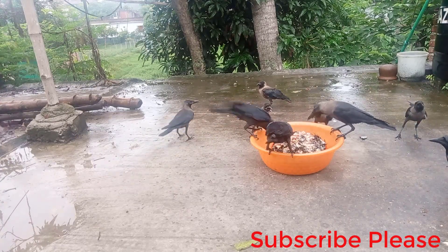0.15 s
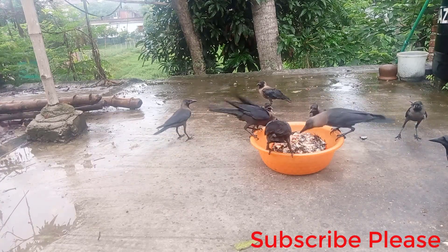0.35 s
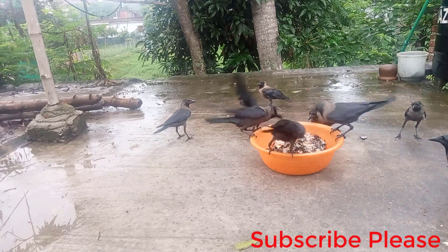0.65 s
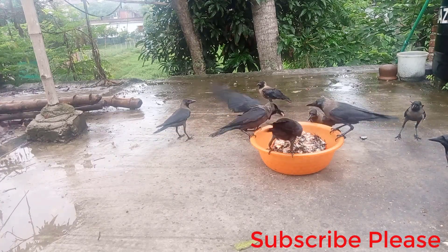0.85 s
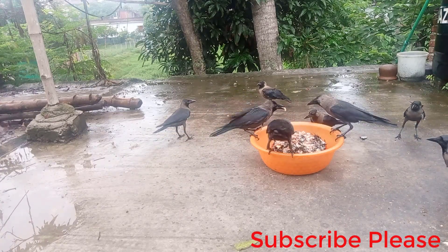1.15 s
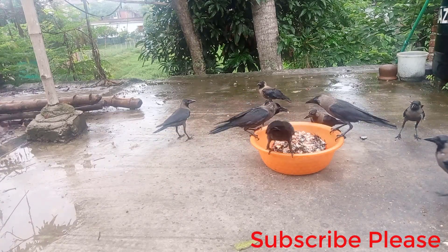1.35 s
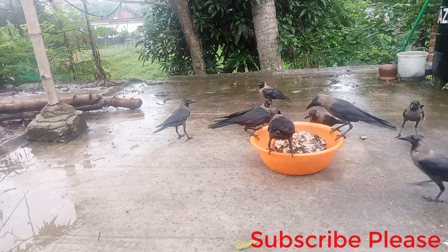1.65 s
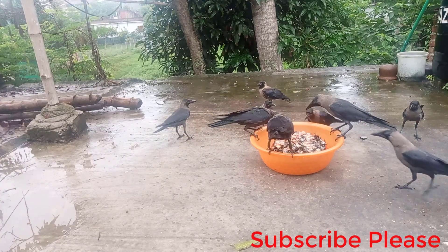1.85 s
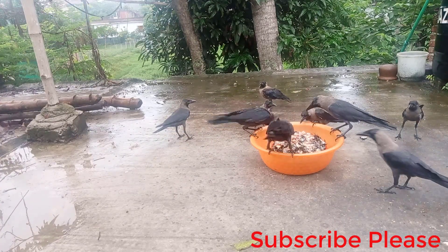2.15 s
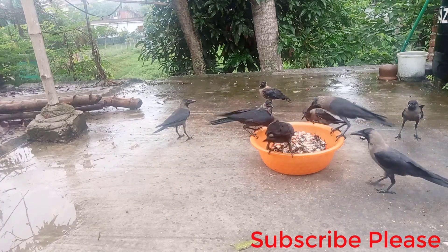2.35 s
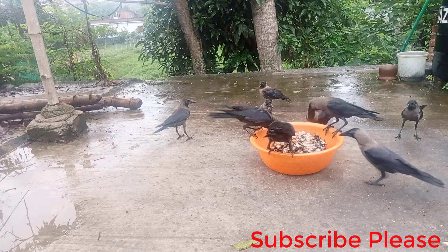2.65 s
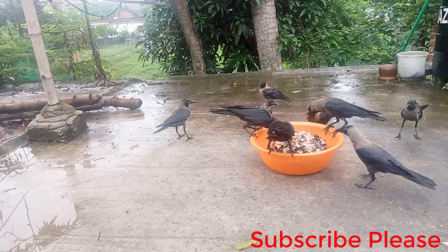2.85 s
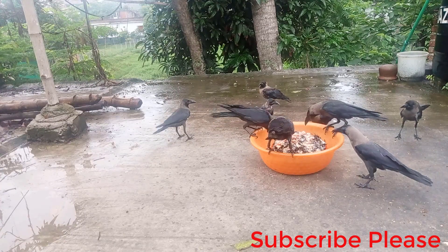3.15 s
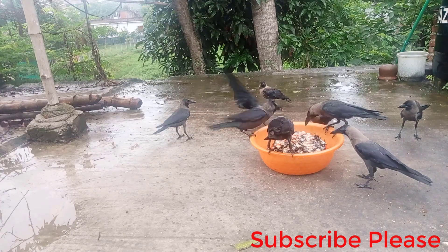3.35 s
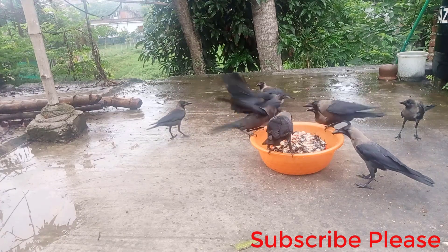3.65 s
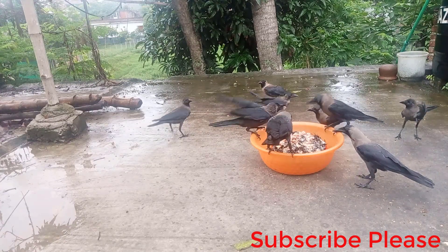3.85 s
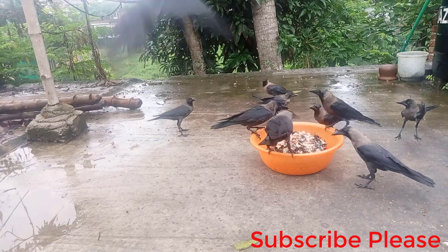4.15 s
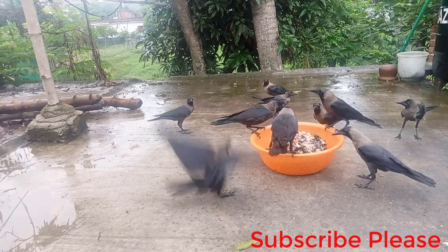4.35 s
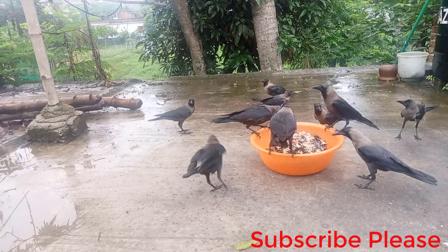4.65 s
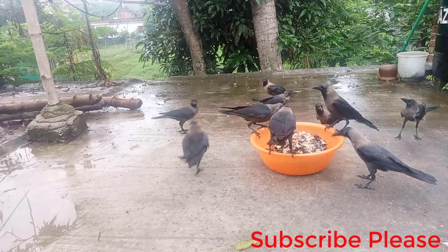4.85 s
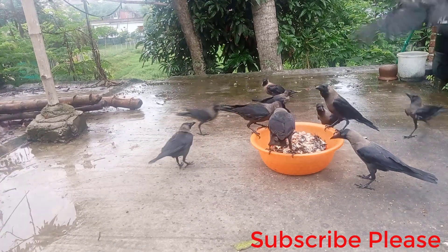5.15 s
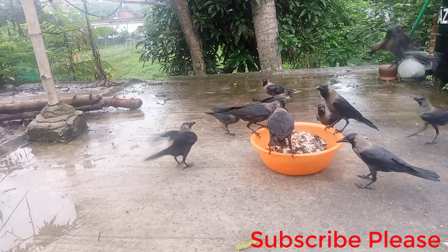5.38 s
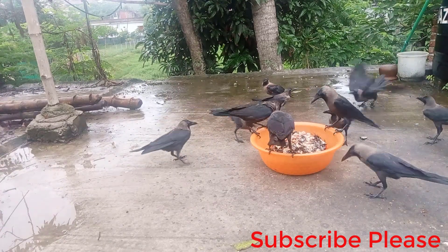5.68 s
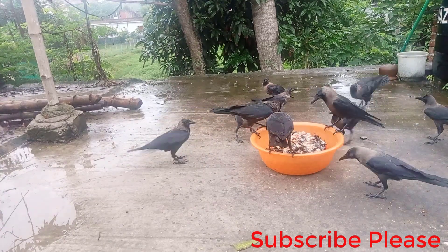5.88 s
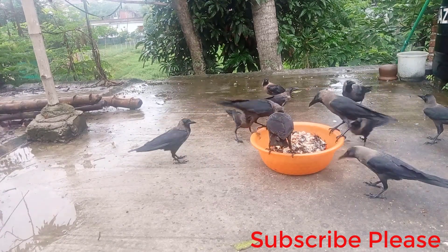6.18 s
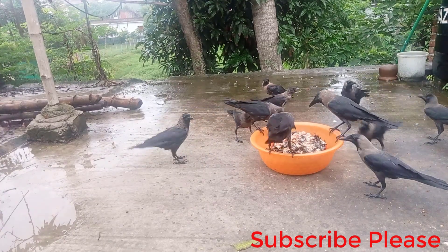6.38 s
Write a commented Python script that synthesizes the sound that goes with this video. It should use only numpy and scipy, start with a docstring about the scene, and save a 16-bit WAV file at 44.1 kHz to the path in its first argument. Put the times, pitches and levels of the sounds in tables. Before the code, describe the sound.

In a yard with faint chirps, far-off crows, insect hiss and a low hum, a few pecks and three loud, hoarse caws sound close by. The crows then scuffle, rustling their feathers and rapping a hollow plastic basin with their beaks. Wingbeats swish in, pushing a short low rumble of wind onto the microphone, and feet patter on wet concrete. The rustling settles, ending with some light pecks.

```python
"""Crows feed from a plastic basin on a wet concrete yard, over open air, insects and a faint hum.
First come three harsh, close caws, buzzing membranes shaped by throat and beak, with a few pecks and a
far, hoarse, rising call between. Small birds chirp and distant crows caw throughout. From about 3.5 s
the crows jostle: feathers rustle, beaks tick in the food and knock the basin. At 4.3 s a crow flies in
on swishing wings; gusts rumble on the microphone, feet slap the wet ground, and a few last pecks land."""
import sys
import numpy as np
from scipy import signal
from scipy.fft import rfft, irfft, next_fast_len
from scipy.io import wavfile
from scipy.ndimage import uniform_filter1d, map_coordinates

SR = 44100
rng = np.random.default_rng(int(sys.argv[2]) if len(sys.argv) > 2 else 0)


def wav_record(signal):
    """Record a signal, one row per channel, as 16-bit PCM in the file named by sys.argv[1]."""
    frames = np.transpose(np.atleast_2d(signal))
    bounded = np.clip(frames, -1, 1)
    # unit amplitude maps onto the largest positive 16-bit level
    quanta = np.round(bounded * 32767).astype(np.int16)
    wavfile.write(sys.argv[1], SR, quanta)


N = 287532
TIME = np.arange(N) / SR

# near caws: (time [s], length [s], full-tension pitch [Hz], scoop [s], sag [share], final drop [s],
# flutter depth [share], fluttering part [share], half-tones [dB], roughness [0-1], beak closing [0-1])
NEAR_CAWS = [(0.548, 0.51, 1051, .053, .35, 0.029, .062, 0.82, -4, .08, 0.76),
             (1.256, 0.44, 950.4, 0.024, .47, 0.023, 0.075, 1.08, -10.5, .04, 0.03),
             (2.476, .366, 1163, .024, .26, .021, 0.067, .54, -20, 0.05, 0)]
# envelope of each near caw: (time [s], level [dB], treble against body [dB])
CAW_ENVELOPES = [
    [(0.55, -49, -11), (0.558, -33.5, -18), (0.588, -22, -14), (0.65, -18.5, -13.5), (0.758, -17.5, -15),
     (0.978, -22, -16), (1.02, -28, -14.5), (1.07, -66, -18)],
    [(1.25, -54, -29), (1.268, -48.5, -22), (1.292, -36.5, -21.5), (1.37, -32, -20), (1.41, -37.5, -17),
     (1.418, -34.5, -18), (1.548, -36.5, -18.5), (1.658, -41.5, -19.5), (1.75, -65, -1)],
    [(2.475, -51, -12), (2.495, -34, -18.5), (2.517, -29.5, -14.5), (2.629, -27.5, -10),
     (2.721, -27, -16.5), (2.737, -34.5, -9), (2.779, -26, -21.5), (2.793, -37, -6.5),
     (2.845, -44.5, -15.5)],
]
# throat and beak resonances of the loud, soft and clear caw: (frequency [Hz], gain [dB])
THROAT_LOUD = [(300, -19), (600, -14.5), (1050, -19), (1500, 1), (2050, 8), (2500, 0.5), (3100, -20.5),
               (3800, -10.5), (4300, -14.5), (4900, -27.5), (5700, -20), (6400, -27), (7250, -20),
               (7900, -33), (8500, -31), (12000, -42.5), (15500, -38)]
THROAT_SOFT = [(450, -11), (750, -3), (1000, 1.5), (1400, 9), (1850, 8), (2300, 10.5), (3100, -18.5),
               (4200, -29), (4700, -22.5), (5100, -30), (5650, -23), (6150, -30), (7250, -22),
               (8200, -29.5), (9500, -32), (15000, -47)]
THROAT_CLEAR = [(450, 2), (750, 0), (1150, -6), (1600, 4.5), (2100, 10), (2600, -3.5), (3000, -18.5),
                (3400, -8), (4100, -35.5), (4650, -26), (5150, -31), (5800, -26.5), (6400, -26.5),
                (7100, -13), (8300, -30), (10000, -29.5), (12500, -43), (15500, -38)]
# tone shift of a closing beak: (frequency [Hz], gain [dB])
CLOSING_EQ = [(900, 3.5), (1450, -3), (2000, -2), (2450, 3.5), (2950, 12.5), (3600, -11), (4300, -16.5),
              (5050, 12), (5800, -7.5), (7200, -2), (12000, 3.5)]
# air rushing past the membranes: (frequency [Hz], gain [dB])
RASP_EQ = [(500, -6), (1200, 12), (2300, 0), (4000, 10.5), (8000, 23), (15000, 13.5)]
# early reflections off the concrete and nearby things: (delay [s], gain [dB])
REFLECTIONS = [(.0013, -35), (.0047, -22), (.0089, -12), (0.0166, -8.5)]
# sharp beak clicks: (time [s], relative level [dB], t60 [s])
PECKS = [(.045, -27.5, 0.022), (1.157, -27, 0.031), (1.174, -26.5, .009), (3.32, -41, .015),
         (3.467, -34, .052), (3.612, -13, 0.007), (3.623, -29, 0.063), (3.791, -37.5, 0.037),
         (3.88, -22, 0.012), (3.888, -18.5, 0.0092), (5.154, -32.5, 0.037), (6.268, -37, 0.02),
         (6.39, -35.5, 0.036), (6.487, -31, 0.04)]
# soft scrapes and brisk wing strokes: (time [s], relative level [dB], t60 [s])
SCRAPES_AND_STROKES = [(.026, -39.5, 0.042), (2.394, -35, 0.065), (3.836, -35.5, 0.15), (4.482, -32, 0.06),
                       (4.748, -35.5, 0.095), (5.685, -40.5, 0.081), (6.404, -29, 0.0075)]
# tone shared by clicks, scrapes and brisk strokes: (frequency [Hz], gain [dB])
BURST_EQ = [(300, 3.5), (1500, 6), (3800, 10), (5500, -5.5), (7500, 3), (11000, -11.5), (15000, -4)]
# blows on the basin: (time [s], gain [dB])
KNOCKS = [(1.175, -60), (3.485, -56), (3.612, -33), (3.624, -41), (3.70, -57), (6.487, -47)]
# modes of the plastic basin: (frequency [Hz], relative level [dB], t60 [s])
BASIN_MODES = [(188, -41.5, .07), (381, 0.5, 0.077), (487, 9, 0.071), (568, 7.5, 0.034), (766, -5.5, 0.066),
               (1830, -8, .04)]
# feet on wet ground: (time [s], relative level [dB], t60 [s], centre [Hz])
SLAPS = [(4.912, -32, 0.16, 1490), (5.153, -28.5, 0.2, 2230), (5.154, -31, 0.36, 664),
         (5.41, -32.5, 0.18, 910)]
# tone of rustling feathers: (frequency [Hz], gain [dB])
FEATHER_EQ = [(300, 14), (1000, 3), (3300, 6), (4700, -5.5), (7300, 0), (11000, -13), (15000, -8)]
# gusts on the microphone: (time at full strength [s], hold [s], level [dB])
GUSTS = [(4.602, 0.096, -25.5), (4.748, 0.095, -22), (4.912, 0.12, -22.5), (5.209, 0.18, -36.5),
         (5.274, 0.014, -33.5), (5.478, .08, -36), (5.612, 0.19, -42), (6.139, 0.017, -39),
         (6.357, 0.23, -50.5)]
# rumble of their eddies: (frequency [Hz], gain [dB])
EDDY_EQ = [(15, -52), (25, -22), (82, 1), (180, -2.5), (258, -9), (293, -10), (399, -22.5), (469, -24),
           (800, -46.5), (1200, -65), (1560, -81), (2640, -120)]
# the hardest buffets of air: (time [s], level [dB], width [s])
BUFFETS = [(1.246, -40.5, 0.0025), (4.671, -18, 0.00084), (4.711, -19.5, 0.00068), (4.813, -13, 0.00081),
           (4.833, -5.5, 0.0015), (4.916, -14, 0.0016), (4.945, -9.5, 0.00062), (5.037, -11.5, .0012),
           (5.298, -21.5, 0.0012)]
# distant caws: (time [s], length [s], top pitch [Hz], relative level [dB])
FAR_CAWS = [(0.131, 0.19, 596, -50.5), (2.839, 0.18, 695, -55), (3.207, .26, 691, -49.5),
            (4.313, 0.29, 618, -52.5), (4.716, 0.36, 599, -52), (5.755, 0.29, 683, -49)]
# a crow's voice dulled by distance: (frequency [Hz], gain [dB])
FAR_EQ = [(330, -12), (650, -16), (1000, -6), (1400, -12), (1900, 5), (2350, -1), (3000, -14), (4000, -14),
          (9000, -48)]
# small-bird chirps and squeaks, and one long, hoarse, rising call from afar:
# (time [s], length [s], pitch [Hz], glide [octaves], level [dB])
BIRD_CALLS = [(0.446, 0.12, 3300, -0.52, -57.5), (1.14, 0.053, 2935, 0.052, -36),
              (1.18, 0.083, 2950, 0.0016, -52.5), (1.876, 0.7, 1770, 0.34, -59.5),
              (2.114, 0.064, 3120, -0.12, -59.5), (2.253, 0.093, 3460, -0.45, -59),
              (3.555, .067, 2800, 0.21, -51.5), (3.655, 0.025, 2300, -.08, -50.5),
              (3.788, 0.047, 1856, -.12, -53.5), (3.82, 0.079, 2850, .33, -42),
              (3.903, .12, 2395, -.55, -54), (4.089, .095, 2900, .22, -62.5), (4.25, 0.38, 4190, -.01, -60),
              (4.578, 0.1, 2560, 0.49, -57.5), (4.649, 0.088, 2810, -0.39, -58.5),
              (4.758, .1, 2966, -.17, -57), (4.98, 0.205, 4250, -0.12, -65),
              (5.304, 0.049, 3280, -0.25, -54)]
# tone of the open air: (frequency [Hz], gain [dB])
AIR_EQ = [(15, -52), (25, -25), (92, 4), (170, -5.5), (200, 2.5), (229, -4.5), (476, -9.5), (575, -13),
          (1290, -17.5), (1740, -14.5), (2840, -16.5), (3160, -14.5), (6210, -32), (8830, -24.5),
          (16000, -51)]
# bands of insect hiss: (centre [Hz], width [Hz], level [dB])
INSECT_BANDS = [(5450, 390, -74), (7050, 570, -77), (8930, 200, -80)]
# partials of the hum: (frequency [Hz], level [dB])
HUM_PARTIALS = [(100.5, -70), (200.5, -62)]
# reverb time of the yard: (frequency [Hz], t60 [s])
YARD_DECAY = [(200, 0.13), (2000, 0.34), (5000, 0.19), (14000, 0.12)]

JOSTLE_START_S = 3.47
HIT_TIME = TIME[:SR // 4]


def near_crows():
    """Three close caws, each through its own throat, with early reflections."""
    direct = np.zeros(N)
    throats = THROAT_LOUD, THROAT_SOFT, THROAT_CLEAR
    for row, envelope, throat in zip(NEAR_CAWS, CAW_ENVELOPES, throats):
        add(direct, *caw(row, envelope, throat))
    out = direct.copy()
    for delay, db in REFLECTIONS:
        add(out, delay, amp(db) * direct)
    return out


def caw(row, envelope, throat, taut_flutter_hz=83.14, crossover_hz=3100):
    """One arch of membrane tension drives pitch, flutter and grit; throat and beak filter the buzz."""
    start, length, taut_hz, scoop_s, sag, drop_s, depth, fluttering, half_db, rough, closes = row
    t = np.arange(0, length, 1 / SR)
    scoop = 1 - .53 * np.exp(-t / scoop_s)
    droop = 1 - sag * (t / length) ** 2.5
    drop = 1 - .68 * np.exp((t - length) / drop_s)  # the air runs out
    tension = np.maximum(scoop * droop * drop, .1)
    slack = 1 - tension
    calm = np.clip((t - fluttering * length) / .03, 0, 1)  # rises as the flutter dies
    closing = closes * np.clip((t - .604 * length) / .044, 0, 1)
    # starting and slack membranes buzz unevenly, and the closing beak adds rasp
    rough = rough + .55 * np.exp(-t / .04) + .85 * slack ** 2 + .25 * closing
    buzz = syrinx(taut_hz * tension, taut_flutter_hz * tension ** .4,
                  depth=depth + (.006 - depth) * calm,
                  half_db=half_db + 21.5 * slack + 4 * calm,
                  rough=rough * (1 - .85 * calm * tension))
    voice = colour(buzz, throat)
    voice = (1 - closing) * voice + closing * colour(voice, CLOSING_EQ)
    body = signal.sosfiltfilt(signal.butter(6, crossover_hz, fs=SR, output="sos"), voice)
    times, *columns = np.transpose(envelope)
    level_db, treble_db = (np.interp(start + t, times, column) for column in columns)
    voice = steady(body) + amp(treble_db) * steady(voice - body)
    return start, amp(level_db) * voice * signal.windows.tukey(len(t), .03)


def syrinx(hz, flutter_hz, depth, half_db, rough, jitter=.06, tremble=.007, throb=.34, smear=1.2):
    """Membranes buzz, every other cycle unlike the last, while a flutter swings pitch and level."""
    size = len(hz)
    flutter = phase(flutter_hz * (1 + .19 * rough * wander(size, 120)))
    unsteady = jitter * rough * wander(size, 700) + tremble * wander(size, 1500)
    pitch = hz * (1 + depth * np.sin(flutter) + unsteady)
    k = np.arange(1, 49)[:, None]  # multiples of half the pitch: the odd ones are the half-tones
    half_tones = np.minimum(amp(half_db) * k / 4, 1)  # unequal cycles show most in the highs
    strength = np.where(k % 2, half_tones, 1) * (k * pitch < SR * .85)
    # soft membranes close gradually, which smears each pulse over its cycle
    buzz = unit((strength * np.cos(k * phase(pitch / 2) + smear * k ** 2)).sum(0))
    hiss = (.015 + .5 * rough) * colour(rng.standard_normal(size), RASP_EQ)
    return (buzz + hiss) * (1 + throb * np.tanh(20 * depth) * np.cos(flutter + .022))


def pecks_and_scuffles(ticks_per_s=7.6, snap_s=.00044, swell_s=.0061):
    """Pecks snap, soft scrapes and brisk wing strokes swell, and jostling birds tick in the food."""
    out = np.zeros(N)
    span = N / SR - JOSTLE_START_S
    ticks = [(JOSTLE_START_S + span * when, -60 + 24 * loud, .012)
             for when, loud in rng.random((int(ticks_per_s * span), 2))]
    for rows, attack_s in (PECKS, snap_s), (SCRAPES_AND_STROKES, swell_s), (ticks, snap_s):
        attack = np.minimum(HIT_TIME / attack_s, 1) ** 2
        for start, db, t60 in rows:
            release = decay(np.maximum(HIT_TIME - attack_s, 0), t60)
            add(out, start, amp(db - 9) * noise(len(HIT_TIME), BURST_EQ) * attack * release)
    return out


def basin():
    """Each knock rings the short, hollow modes of the plastic."""
    out = np.zeros(N)
    ring = sum(amp(db) * decay(HIT_TIME, t60) * np.sin(2 * np.pi * hz * HIT_TIME)
               for hz, db, t60 in BASIN_MODES)
    for start, db in KNOCKS:
        add(out, start, amp(db) * ring)
    return out


def feet():
    """Feet slap the wet ground in dull bursts of noise."""
    out = np.zeros(N)
    for start, db, t60, hz in SLAPS:
        add(out, start, amp(db - 11.5) * band(len(HIT_TIME), hz, .63 * hz) * decay(HIT_TIME, t60))
    return out


def feathers(flight_start_s=4.3, strokes=9, wingbeat_hz=5.94, stroke_s=.17, grains_per_s=4000):
    """A grainy rustle fades as the jostling settles; even wing strokes swell it, most in mid flight."""
    since = np.maximum(TIME - JOSTLE_START_S, 0)
    level = (since > 0) * amp(-53 - 5.5 * since + 3.5 * wander(N, 16))
    stroke = np.hanning(round(stroke_s * SR))
    for k, place in enumerate(np.linspace(-1, 1, strokes)):
        add(level, flight_start_s + k / wingbeat_hz, amp(-53 - 7 * place ** 2) * stroke)
    grains = rng.standard_normal(N) * (rng.random(N) < grains_per_s / SR)
    grains *= amp(1.9 * np.minimum(rng.exponential(1, N), 4))  # a few grains stick out
    return level * unit(colour(grains, FEATHER_EQ))


def gusts(attack_s=.021, release_s=.026, full_speed_db=-22):
    """Eddies on the microphone swell, hold and die; the hardest land as single push-pull buffets."""
    level = np.zeros(N)
    for at, hold, db in GUSTS:
        before, after = np.minimum(TIME - at, 0), np.maximum(TIME - at - hold, 0)
        level += amp(db) * np.exp(before / attack_s - after / release_s)
    eddies = steady(noise(N, EDDY_EQ), window=1800, floor=1e-6)
    # slow air makes only large, low eddies
    slow = unit(colour(eddies, [(120, 5), (220, -8), (400, -44), (900, -55)]))
    speed = np.clip(level / amp(full_speed_db), 0, 1)
    out = level * (speed * eddies + (1 - speed) * slow)
    for at, db, width in BUFFETS:
        u = (TIME - at) / width
        out -= amp(db) * u * np.exp((1 - u ** 2) / 2)
    return signal.sosfilt(signal.butter(3, 52, "high", fs=SR, output="sos"), out)


def far_crows():
    """Arched caws, lower in pitch and dulled by distance."""
    out = np.zeros(N)
    for start, length, hz, db in FAR_CAWS:
        u = np.linspace(0, 1, round(length * SR))
        arch = abs(np.sin(np.pi * u ** .53))  # the pitch rises fast and sinks slowly
        call = syrinx(hz * (.85 + .15 * arch), flutter_hz=77.9, depth=.035, half_db=.5, rough=.19)
        add(out, start, amp(db) * unit(colour(call, FAR_EQ)) * signal.windows.tukey(len(u), .5))
    return out


def background_birds(chatter_per_s=4):
    """Small-bird chirps and squeaks and one long, hoarse, far call, over faint chatter from the trees."""
    out = np.zeros(N)
    for start, *shape in BIRD_CALLS:
        add(out, start, bird_call(*shape))
    chatter = rng.uniform(-1, 1, (int(chatter_per_s * N / SR), 4))
    for k, (when, high, way, loud) in enumerate(chatter):
        chirp = bird_call(.075, hz=3140 * 2 ** (.27 * high), glide=.333 * np.sign(way), db=-65 + 2 * loud)
        add(out, (k + .5 + .5 * when) / chatter_per_s, chirp)
    return out


def bird_call(length, hz, glide, db):
    """A gliding tone; the wider it glides, the more it arches and the hoarser it gets."""
    u = np.linspace(-.5, .5, round(length * SR))
    pitch = hz * 2 ** (glide * u - .487 * abs(glide) * u ** 2)
    hoarseness = .119 * (.13 + 1.43 * abs(glide))
    pitch *= 1 + hoarseness * wander(len(u), 900)
    return amp(db) * unit(np.sin(phase(pitch)) * np.cos(np.pi * u))


def open_air(wash_db=-56.5):
    """The ambience bed: outdoor wash, thin insect hiss and a faintly wavering hum."""
    wash = noise(N, AIR_EQ) * amp(wash_db + wander(N, 13))
    insects = sum(amp(db + 2 * wander(N, 12)) * band(N, hz, width) for hz, width, db in INSECT_BANDS)
    hum = sum(amp(db + .59 * wander(N, 9.3)) * np.sqrt(2) * np.sin(phase(hz + 1.4 * wander(N, 9.7)))
              for hz, db in HUM_PARTIALS)
    return wash + insects + hum


def yard_reverb(send, echoes_per_s=2000):
    """Scattered echoes from walls and trees; the mids ring longest."""
    taps = rng.choice([-1., 1.], SR) * (rng.random(SR) < echoes_per_s / SR)
    taps[:SR // 150] = 0  # pre-delay
    hz, t, spectrum = signal.stft(taps, SR, nperseg=256)
    tail = signal.istft(spectrum * decay(t, curve_at(YARD_DECAY, hz)[:, None]), SR, nperseg=256)[1]
    return signal.fftconvolve(send, tail / np.linalg.norm(tail))[:N]


def amp(db):
    """Decibels to gain."""
    return 10 ** (np.asarray(db) / 20)


def unit(x):
    """Scales to rms 1."""
    return x / np.sqrt(np.mean(x ** 2) + 1e-20)


def steady(x, window=1600, floor=1e-12):
    """Rides the gain to hold the rms near 1 over a window of samples."""
    return x / np.sqrt(abs(uniform_filter1d(x ** 2, size=window)) + floor)


def decay(t, t60):
    """Falls 60 dB in t60 seconds."""
    return np.exp(-np.log(1000) * t / t60)


def phase(hz):
    """Running phase of a moving pitch, in radians."""
    return 2 * np.pi * np.cumsum(hz) / SR


def curve_at(points, hz):
    """Joins points by straight lines over log frequency."""
    f, value = np.transpose(points)
    return np.interp(np.log(hz + 1), np.log(f + 1), value)


def colour(x, eq):
    """Filters x by an EQ curve in dB."""
    size = next_fast_len(len(x) + 2048)
    gain = amp(curve_at(eq, np.fft.rfftfreq(size, 1 / SR)))
    return irfft(rfft(x, size) * gain, size)[:len(x)]


def noise(size, eq):
    """Noise of rms 1 shaped by an EQ curve."""
    return unit(colour(rng.standard_normal(size), eq))


def band(size, hz, width_hz):
    """Noise of rms about 1 in a bell-shaped band."""
    f = np.fft.rfftfreq(size + SR, 1 / SR)
    bell = np.exp(-((f - hz) / width_hz) ** 2)
    return unit(irfft(rfft(rng.standard_normal(size + SR)) * bell))[:size]


def wander(size, rate_hz):
    """A smooth random curve of rms about 1."""
    at = np.arange(size) * rate_hz / SR
    return map_coordinates(rng.standard_normal(4096), [at], order=3, mode="wrap")


def add(mix, start, sound):
    """Mixes a sound in at start seconds."""
    part = mix[max(round(start * SR), 0):][:len(sound)]
    part += sound[:len(part)]


def scene():
    """The mono mix: near sounds almost dry, far ones wetter."""
    crows = near_crows()
    feeding = pecks_and_scuffles() + basin() + feet()
    birds, far = background_birds(), far_crows()
    reverb = yard_reverb(amp(-18) * crows + amp(-12) * feeding + amp(-10.5) * birds + amp(-14) * far)
    return (crows + feeding + birds + amp(-6) * far + reverb + feathers() + gusts() + open_air())[None]


def record(dry, low_cut_hz=30, high_cut_hz=15850):
    """The microphone loses the deepest bass; a steep high cut trims the top."""
    thin = signal.sosfilt(signal.butter(2, low_cut_hz, "high", fs=SR, output="sos"), dry)
    high_cut = signal.firwin(511, high_cut_hz, window=("kaiser", 9), fs=SR)
    return signal.oaconvolve(thin, high_cut[None], "same")


dry = scene()
out = record(dry)
wav_record(out)
```